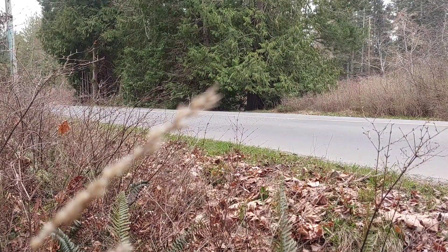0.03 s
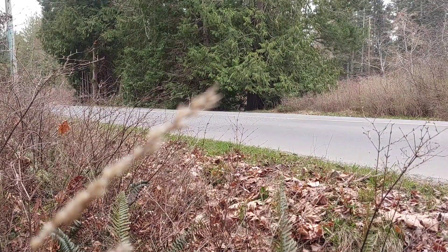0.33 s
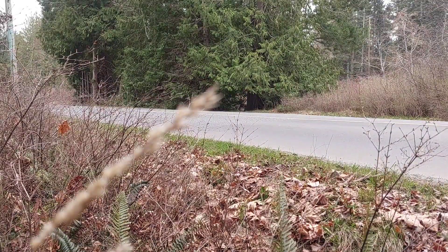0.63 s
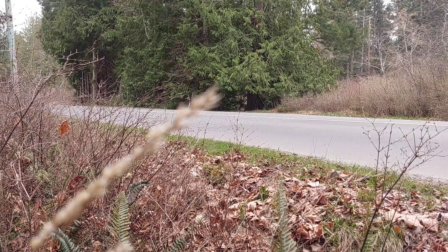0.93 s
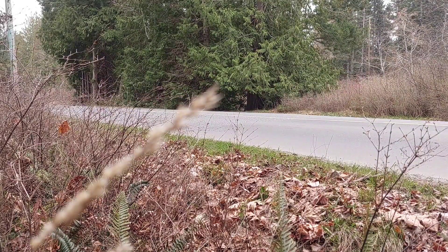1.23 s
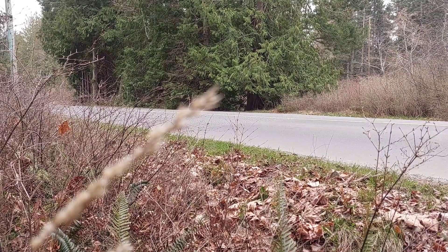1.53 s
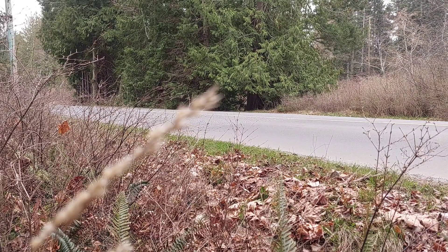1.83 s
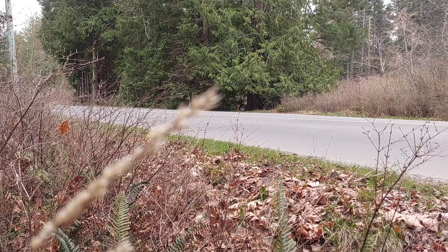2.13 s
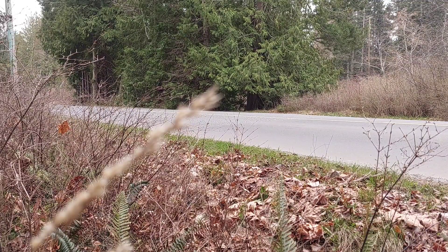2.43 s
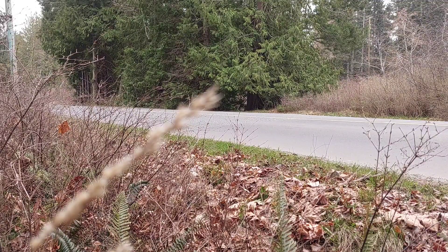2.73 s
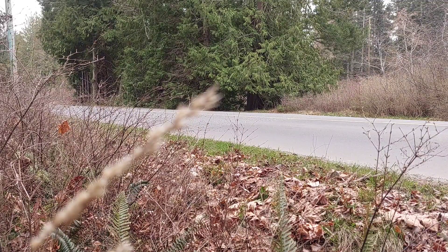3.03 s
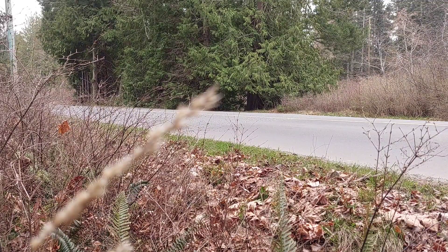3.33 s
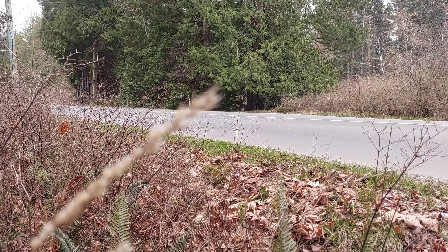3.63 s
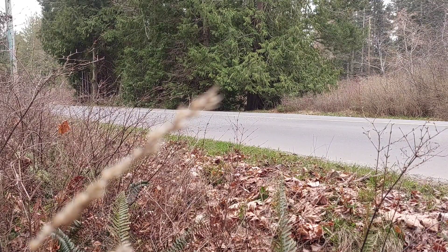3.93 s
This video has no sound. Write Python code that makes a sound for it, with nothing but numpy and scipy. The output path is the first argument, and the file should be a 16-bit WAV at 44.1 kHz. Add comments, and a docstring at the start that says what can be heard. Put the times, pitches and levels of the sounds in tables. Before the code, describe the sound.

A departing car's low exhaust and tyre noise fade down a quiet wooded road.

```python
"""A car drives away down a wooded road, heard from the verge. At first the exhaust drones under load over
tyre roar, a brief engine-bay rush and faint forest air. From 0.5 s it burbles and thuds off the throttle,
the tyres flick grit, then the revs sink and the roar dulls with distance. A small bird chirps high in the
trees from 1.2 s, a dry leaf stirs at 2 s, and a faint whine comes through near 3.4 s."""
import sys
import numpy as np
from scipy import signal
from scipy.fft import rfft, irfft
from scipy.io import wavfile
from scipy.ndimage import uniform_filter1d, map_coordinates

SR = 44100
rng = np.random.default_rng(int(sys.argv[2]) if len(sys.argv) > 2 else 0)


def pcm_store(signal):
    """Save signal as 16-bit PCM."""
    levels = np.round(np.clip(np.atleast_2d(signal), -1, 1) * 32767)
    wavfile.write(sys.argv[1], SR, levels.astype(np.int16).T)


N = 176400

# scattering by the trees: freq_hz, power_share
TREE_SCATTER = [(150, 0.03), (500, 0.47), (1200, 0.2), (3500, 0.48), (6000, 0.26), (9000, 0.85),
                (15000, .85)]


def undb(db):
    """Decibels to gain."""
    return 10 ** (np.asarray(db) / 20)


def unit(x):
    """Scale to rms 1."""
    return x / np.sqrt(np.mean(x ** 2))


def curve(table, t=None, column=1):
    """One table column over time."""
    rows = np.array(table, float)
    return np.interp(np.arange(N) / SR if t is None else t, rows[:, 0], rows[:, column])


def at_hz(table, hz):
    """A table read on a log-frequency axis."""
    rows = np.array(table, float)
    return np.interp(np.log(hz + 1), np.log(rows[:, 0]), rows[:, 1])


def walk(rate_hz):
    """Smooth random drift, rms 1."""
    hold = max(int(SR / rate_hz), 1)
    steps = np.repeat(rng.standard_normal(N // hold + 1), hold)
    return unit(uniform_filter1d(uniform_filter1d(steps, hold), hold)[:N])


def bins_hz():
    """Frequencies of a whole-length spectrum."""
    return np.arange(N // 2 + 1) * SR / N


def pan(x, right_db):
    """Raise the right side over the left by right_db."""
    return np.array([x[0] * undb(-right_db / 2), x[1] * undb(right_db / 2)])


def from_car(x, stretch=1):
    """Direct path from the receding car: later on the left."""
    # left delay: time_s, delay_ms
    left_lag = [(0, 0.42), (.3, 0.38), (.8, 0.32), (1.4, 0.29), (2.4, 0.28), (4, 0.25)]
    lag_samples = stretch * curve(left_lag) * SR / 1000
    return np.array([map_coordinates(x, [np.arange(N) - lag_samples], mode="mirror"), x])


def woods(x, t60_s):
    """Diffuse echo from the trees, different on each side."""
    tails = rng.standard_normal((2, SR)) * np.exp(-np.log(1000) * np.arange(SR) / SR / t60_s)
    return np.array([signal.fftconvolve(x, tail / np.linalg.norm(tail))[:N] for tail in tails])


def pipe_ring():
    """The exhaust pipe's response to one puff, peak 1."""
    # pipe response: freq_hz, gain_db
    response = [(20, -27), (45, -22.5), (65, -1), (110, 6.5), (150, -1), (190, -6.5), (240, -15),
                (290, -32), (450, -35.5), (1500, -58), (12000, -120)]
    cepstrum = irfft(np.log(undb(at_hz(response, bins_hz()))), N)
    cepstrum[1:N // 2] *= 2  # fold to minimum phase
    cepstrum[N // 2 + 1:] = 0
    ring = irfft(np.exp(rfft(cepstrum)), N)[:SR // 10]
    return ring / np.abs(ring).max()


def exhaust(cycles):
    """A drone that stumbles off the throttle; uneven firings and single thuds ring the pipe."""
    # firing harmonics 1-3: time_s, level_db
    first = [(0, -26), (.19, -33), (.3, -29), (.43, -27.5), (.54, -40), (.66, -35), (.74, -29),
             (.87, -35.5), (1.05, -32), (1.3, -32), (1.5, -37), (1.72, -33.5), (2, -41), (2.14, -36.5),
             (2.6, -37.5), (2.95, -42), (3.15, -48), (3.27, -56), (3.55, -51), (3.64, -56), (4, -50)]
    second = [(0, -22), (.2, -25), (.48, -25.5), (.58, -31), (.67, -43), (.77, -31.5), (.88, -41),
              (1.02, -34.5), (1.4, -43), (2.4, -44.5), (3, -50), (3.55, -52), (3.7, -43), (3.8, -46.5),
              (4, -45.5)]
    third = [(0, -29.5), (.18, -30.5), (.31, -34), (.48, -33), (.58, -50), (1.3, -54), (1.85, -51),
             (3.5, -59), (4, -55)]
    # higher harmonics: multiple, level_re_third_db
    overtones = [(4, -18.5), (5, -19), (9, -28)]
    # uneven firings: time_s, level_db
    burble_level = [(0, -49), (.5, -51), (.6, -39), (.8, -42), (1, -46), (1.25, -42), (2.25, -40.5),
                    (2.5, -45), (2.8, -40), (3.25, -54), (3.42, -43), (3.62, -54.5)]
    # exhaust thuds: start_s, peak_db
    thud_peaks = [(.565, -24.5), (.593, -26), (.645, -25), (.685, -30), (1.13, -31), (1.296, -31),
                  (1.525, -31), (1.79, -32), (2.133, -28), (2.19, -30), (2.22, -30), (2.247, -29),
                  (2.343, -30), (2.456, -31), (2.587, -29.5), (2.72, -28), (2.764, -30), (2.823, -31),
                  (2.94, -30), (3.366, -33.5), (3.448, -36)]
    wobble_db, stumble_db, lope = .5, 2.1, .25

    harmonics = [(1, curve(first)), (2, curve(second)), (3, curve(third))]
    harmonics += [(round(k), curve(third) + db) for k, db in overtones]
    stumble = np.minimum(undb(curve(burble_level) - curve(second)), 1)
    drone = 0
    for k, db in harmonics:
        drift_db = (wobble_db + stumble_db * stumble * (k > 1)) * walk(rate_hz=24)
        drone -= np.sqrt(2) * undb(db + drift_db) * np.cos(2 * np.pi * k * (cycles - 1 / 4))

    firings = np.flatnonzero(np.diff(np.floor(cycles)))
    puffs, thuds, ring = np.zeros(N), np.zeros(N), pipe_ring()
    strong_weak = (-1) ** np.arange(len(firings))
    puffs[firings] = rng.uniform(-1, 1, len(firings)) + lope * strong_weak
    for start_s, peak_db in thud_peaks:
        thuds[int(start_s * SR)] = undb(peak_db)
    burble = unit(signal.fftconvolve(puffs, ring)[:N]) * undb(curve(burble_level))
    sputter = burble + signal.fftconvolve(thuds, ring)[:N]
    direct = from_car(drone + sputter, stretch=1.45)  # bass bends round the listener: longer delay
    return direct + undb(-14.5) * woods(sputter, t60_s=.55)


def tyres():
    """Tread roar, part direct, part scattered; distance dulls it and the air makes it flutter."""
    # roar: time_s, level_db, treble_db_per_octave, bass_db_per_octave
    roar = [(0, -41.5, -1, 7), (.45, -39.5, -6, -10.5), (.68, -43.5, -3, 0), (1, -44.5, -2.5, 1),
            (1.35, -44.5, -3, 0.5), (1.8, -46.5, -2.5, -0.5), (2.15, -44.5, -2.5, -3),
            (2.45, -46.5, -5.5, -2.5), (2.8, -48, -5.5, -5), (3.17, -52.5, -4.5, -0.5),
            (3.28, -52.5, -17.5, -6), (3.55, -53.5, -17, -2), (4, -55.5, -17, 1)]
    # tread spectrum: freq_hz, density_db
    spectrum = [(30, -5), (150, 14), (300, -3), (450, -1), (600, -3.5), (800, 0.5), (1040, 2.5),
                (1350, -3.5), (1950, -6), (2600, -10), (3700, -13.5), (4600, -18), (5800, -20), (7200, -21),
                (9800, -29.5), (11800, -34), (15500, -41)]
    treble_hz, bass_hz, flutter_db = 2180, 785, 1.0
    hz, t, noise = signal.stft(rng.standard_normal((3, N)), SR, nperseg=1024)
    colour = unit(undb(at_hz(spectrum, hz)))[:, None]
    treble_octaves = np.log2(1 + (hz / treble_hz) ** 4)[:, None] / 4
    bass_octaves = np.clip(np.log2(bass_hz / (hz + 1)), 0, 1)[:, None]
    tilt_db = treble_octaves * curve(roar, t, column=2) + bass_octaves * curve(roar, t, column=3)
    flutter = uniform_filter1d(rng.standard_normal(noise.shape[1:]), size=14, axis=0)
    flutter = unit(uniform_filter1d(flutter, size=7, axis=1))
    gain = undb(curve(roar, t) + tilt_db + flutter_db * flutter)
    scatter = np.clip(at_hz(TREE_SCATTER, hz), 0, 1)[:, None]
    paths = np.sqrt([1 - scatter, scatter, scatter])  # direct, left, right
    sound = signal.istft(noise * paths * colour * gain, SR)[1][:, :N]
    return from_car(sound[0]) + sound[1:]


def engine_rush(cycles):
    """Fan and intake noise that throbs with the firings and soon fades."""
    # engine-bay spectrum: freq_hz, density_db
    spectrum = [(40, -17), (200, 8.5), (400, -2.5), (700, -1.5), (890, 5.5), (1350, -9), (1900, -6),
                (2400, -5.5), (3000, -9.5), (3700, -11), (4700, -14.5), (6200, -21), (7700, -23.5),
                (9500, -32.5), (11700, -27.5), (15500, -37)]
    # rush: time_s, level_db
    level = [(0, -35), (.3, -37.5), (.47, -40.5), (.62, -48.5), (.9, -58), (1.5, -82)]
    hz = bins_hz()
    noise = rfft(rng.standard_normal((3, N))) * unit(undb(at_hz(spectrum, hz)))
    scatter = np.clip(at_hz(TREE_SCATTER, hz), 0, 1) ** 1.64
    paths = np.sqrt([1 - scatter, scatter, scatter])  # direct, left, right
    throb = 1 + .069 * np.cos(2 * np.pi * cycles)
    sound = irfft(noise * paths, N) * undb(curve(level)) * throb
    return from_car(sound[0]) + sound[1:]


def forest_air():
    """Low rumble and faint high hiss; the bass is alike on both sides."""
    # still air: freq_hz, density_db
    spectrum = [(20, -7), (60, 1.5), (200, 6), (500, -29), (1500, -13.5), (2300, -13.5), (3000, -27.5),
                (5600, -34), (7500, -23), (9000, -28.5), (10500, -34.5), (15500, -36)]
    level_db, wide_from_hz = -63, 700
    hz = bins_hz()
    mid, side = rfft(rng.standard_normal((2, N))) * undb(at_hz(spectrum, hz))
    side *= np.minimum(hz / wide_from_hz, 1)
    return undb(level_db) * unit(irfft(np.array([mid + side, mid - side]), N))


def grit():
    """Grit flicked by the tyres: each tick a fast-dying band of noise."""
    # ticks: start_s, centre_hz, level_db
    ticks = [(.534, 13500, -59), (.648, 3010, -45)]
    decay_cycles = 25
    sound, t = np.zeros(N), np.arange(SR // 20) / SR
    for start_s, hz, level_db in ticks:
        band = signal.butter(4, [.8 * hz, min(1.2 * hz, .45 * SR)], "bandpass", fs=SR, output="sos")
        noise = unit(signal.sosfilt(band, rng.standard_normal(len(t))))
        start = int(start_s * SR)
        sound[start:start + len(t)] += undb(level_db) * noise * np.exp(-t * hz / decay_cycles)
    return from_car(sound)


def bird():
    """Thin warbling slurs on the left; most hang, then dive. The trees smear them."""
    # notes: start_s, length_s, from_hz, to_hz, level_db
    notes = [(1.196, 0.045, 7870, 7400, -71), (1.242, .035, 7600, 6500, -69.5),
             (1.356, 0.027, 7900, 7500, -68.5), (1.774, 0.052, 8900, 8100, -76),
             (2.231, 0.029, 9375, 8800, -77), (3.259, 0.069, 8750, 7400, -78),
             (3.311, 0.051, 7700, 7900, -72), (3.688, 0.028, 7690, 7370, -67),
             (3.702, .023, 7600, 5600, -63.5), (3.77, 0.02, 7500, 5500, -66),
             (3.866, 0.024, 8000, 8250, -67), (3.885, 0.024, 7800, 5600, -62.5),
             (3.958, 0.018, 7500, 5700, -66)]
    song, warble_hz = np.zeros(N), 330 * walk(rate_hz=1500)
    for start_s, length_s, from_hz, to_hz, level_db in notes:
        span = np.arange(int(start_s * SR), min(int((start_s + length_s) * SR), N))
        progress = np.linspace(0, 1, len(span))
        pitch_hz = from_hz + (to_hz - from_hz) * progress ** 1.5 + warble_hz[span]
        envelope = undb(level_db) * np.sin(np.pi * progress ** .8)
        song[span] += envelope * np.sin(2 * np.pi * np.cumsum(pitch_hz) / SR)
    # the trees echo each chirp in a diffuse, high tail
    echo_feed = signal.sosfilt(signal.butter(4, 5500, "highpass", fs=SR, output="sos"), song)
    return pan(song + undb(3) * woods(echo_feed, t60_s=.72), right_db=-10)


def leaf_rustle():
    """A dry leaf stirs close by: a brief, crinkly hiss."""
    # rustle: time_s, level_db
    level = [(2.0, -94), (2.05, -77), (2.092, -72), (2.16, -100)]
    # leaf spectrum: freq_hz, density_db
    spectrum = [(2000, -25.5), (5500, 4), (15500, -10)]
    colour = undb(at_hz(spectrum, bins_hz()))
    hiss = unit(irfft(rfft(rng.standard_normal((2, N))) * colour, N))
    crinkle_db = 4 * walk(rate_hz=400)
    return hiss * unit(undb(crinkle_db)) * undb(curve(level))


def whine(cycles):
    """A blurred tone that sinks with the car's speed."""
    # whine: time_s, level_db
    level = [(0, -86), (3.15, -75), (3.42, -57.5), (3.75, -68.5), (4, -65)]
    firing_order, width_hz = 11.45, 26
    phase = 2 * np.pi * firing_order * cycles
    tone = walk(2 * width_hz) * np.cos(phase) + walk(2 * width_hz) * np.sin(phase)
    return from_car(undb(curve(level)) * tone)


def scene():
    """The receding car, the bird and the forest."""
    # engine firings: time_s, rate_hz
    firing_rate = [(0, 73.73), (.39, 75.35), (.82, 75.7), (2.05, 72.71), (2.44, 71.1), (3.3, 64.63),
                   (4, 59.96)]
    # exhaust balance: time_s, right_over_left_db
    balance = [(0, 1.4), (2.7, 1.3), (3.3, .4), (4, 0)]
    cycles = np.cumsum(curve(firing_rate)) / SR
    rolling = tyres() + engine_rush(cycles) + whine(cycles) + grit()
    car = pan(exhaust(cycles), curve(balance)) + pan(rolling, right_db=.7)
    return car + bird() + forest_air() + leaf_rustle()


def record(dry):
    """Short fades at both ends, then a steep low-pass."""
    fade_s, cutoff_hz = .004, 15750
    fades = signal.windows.tukey(N, 2 * fade_s * SR / N)
    return signal.sosfilt(signal.ellip(10, .2, 80, cutoff_hz, fs=SR, output="sos"), dry * fades)


dry = scene()
out = record(dry)
pcm_store(out)
```